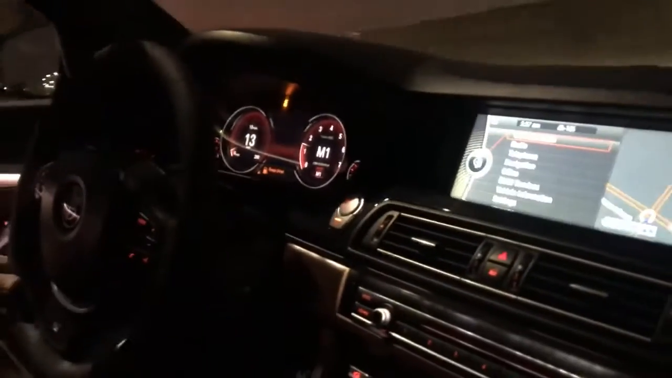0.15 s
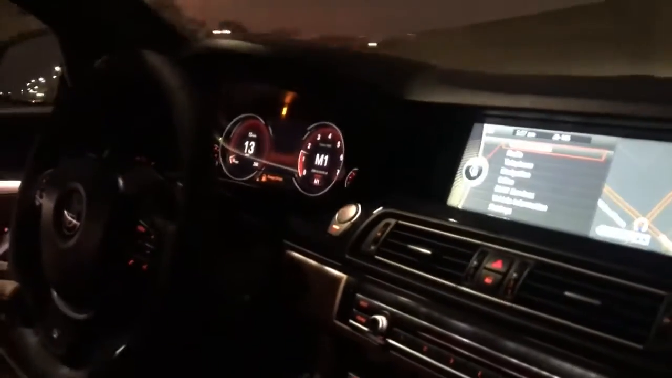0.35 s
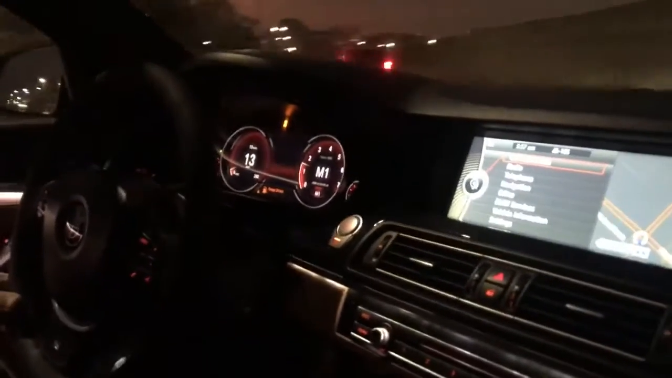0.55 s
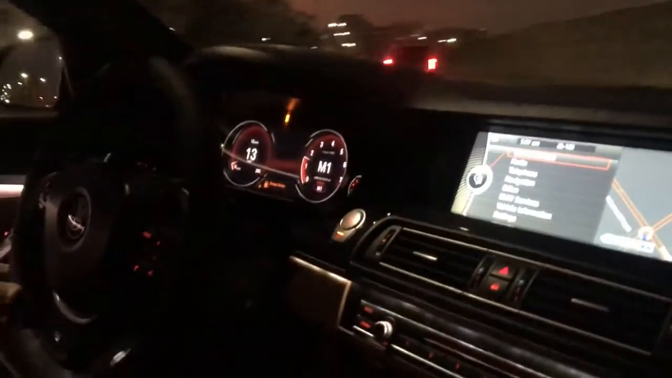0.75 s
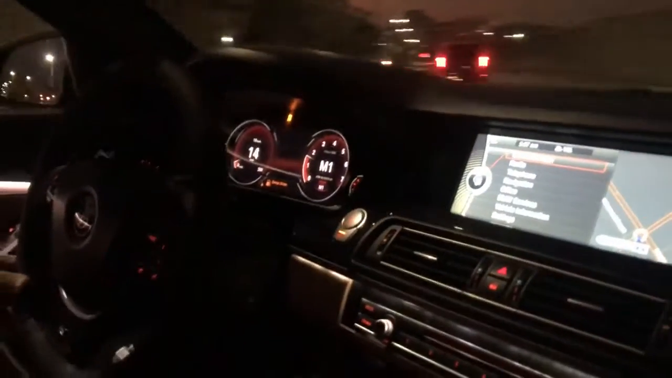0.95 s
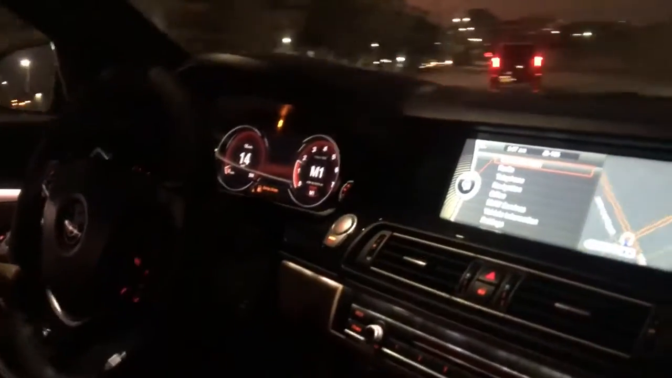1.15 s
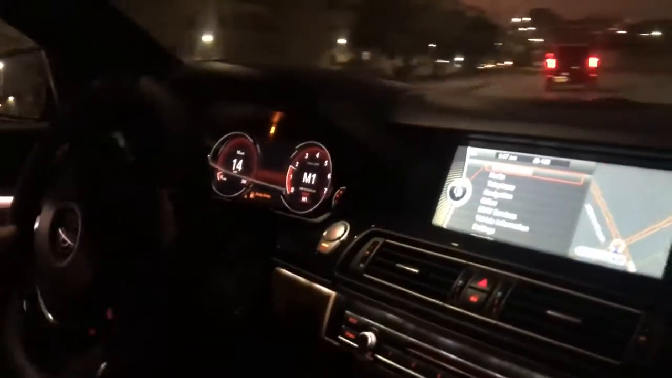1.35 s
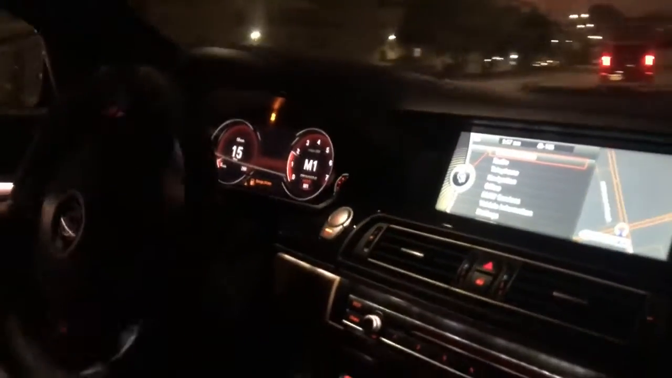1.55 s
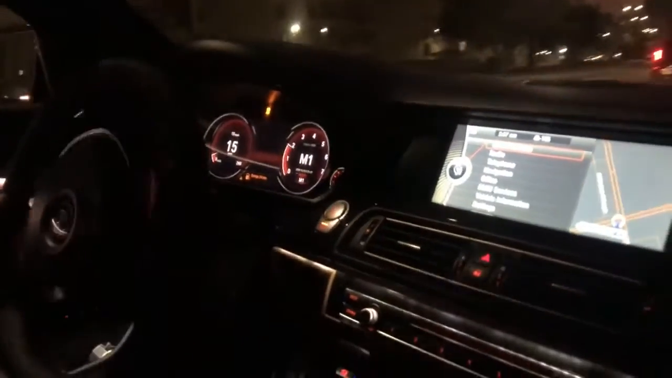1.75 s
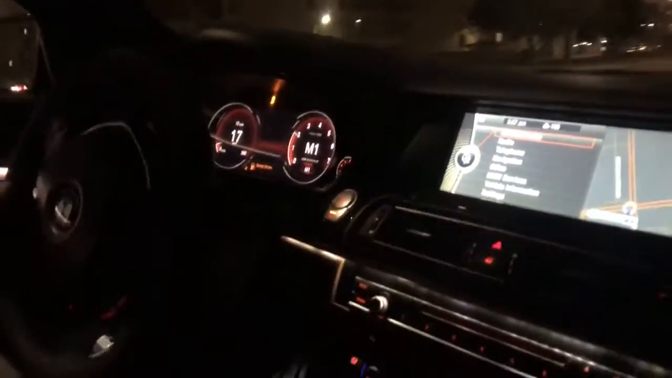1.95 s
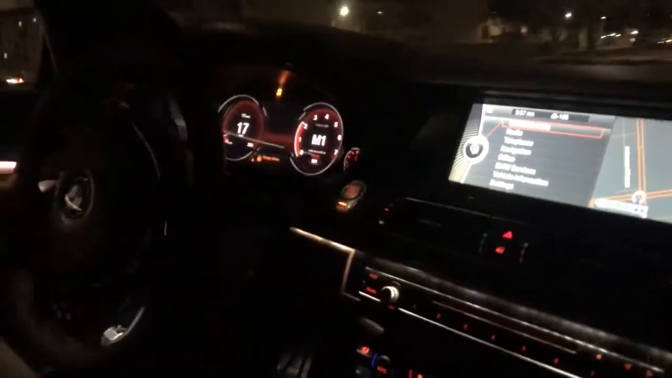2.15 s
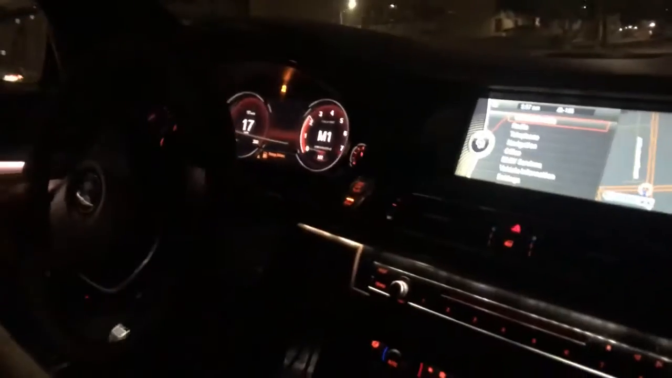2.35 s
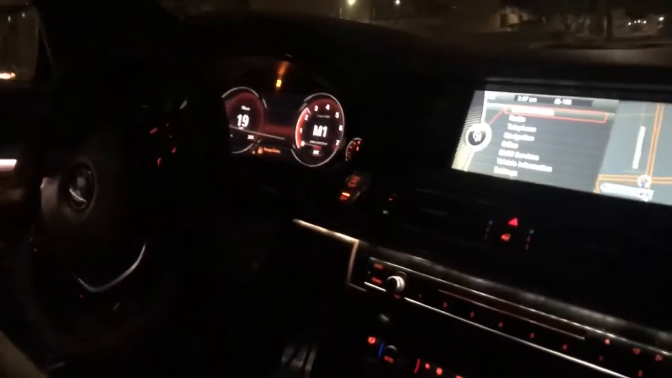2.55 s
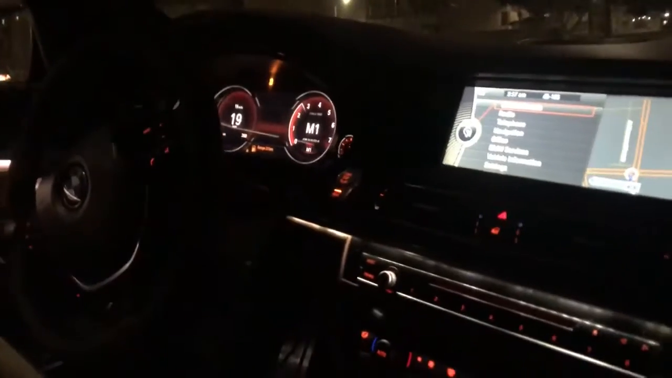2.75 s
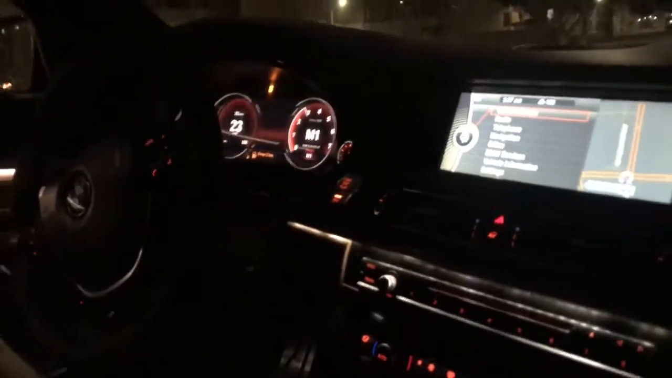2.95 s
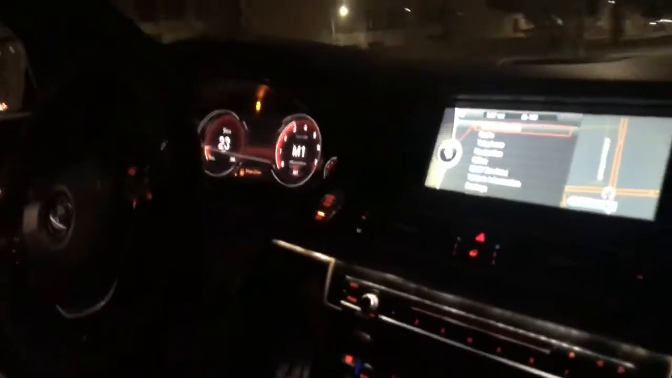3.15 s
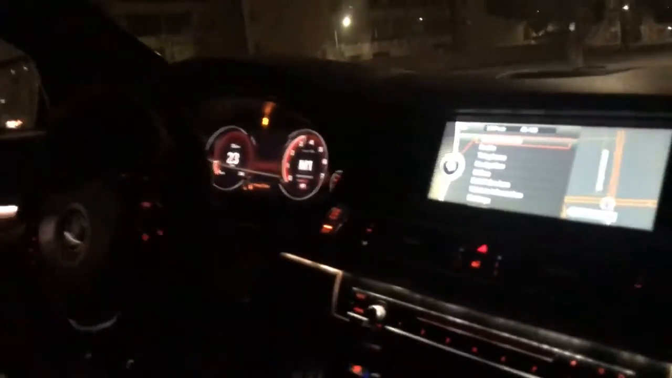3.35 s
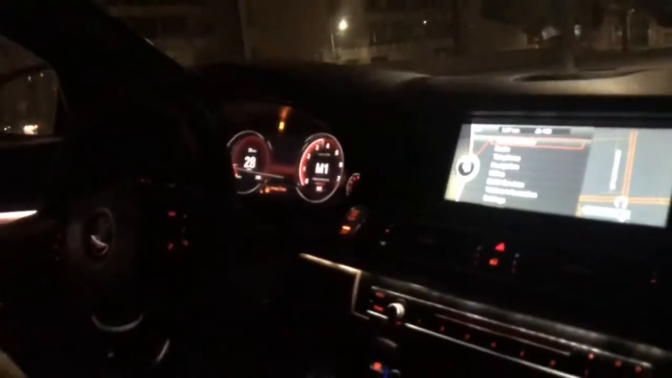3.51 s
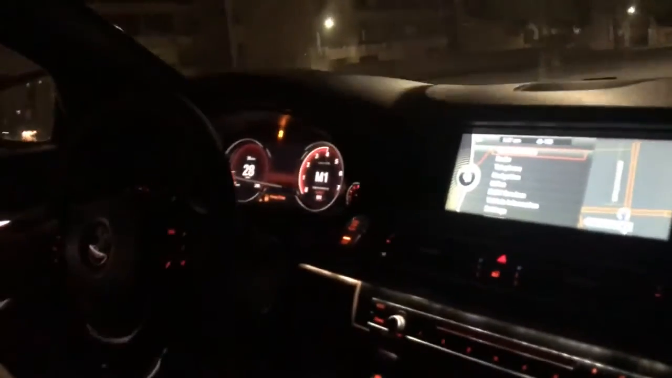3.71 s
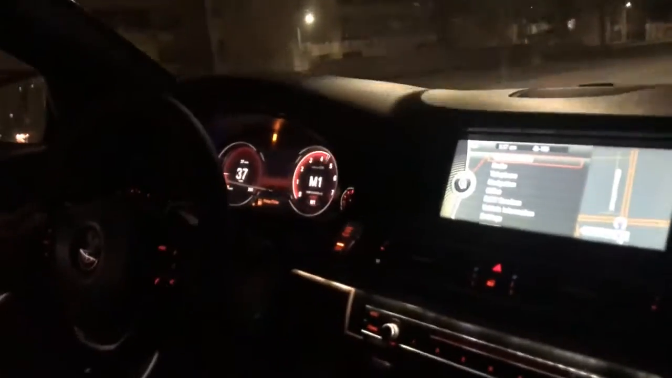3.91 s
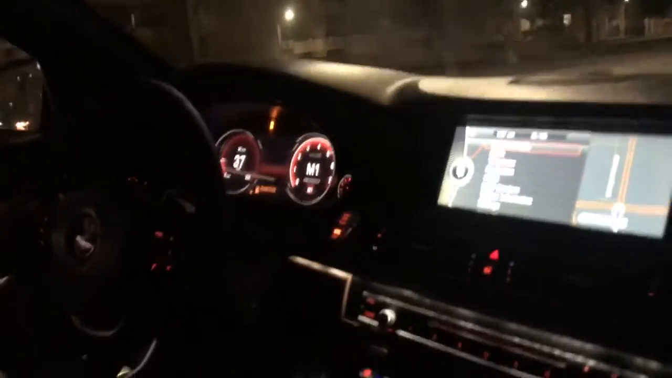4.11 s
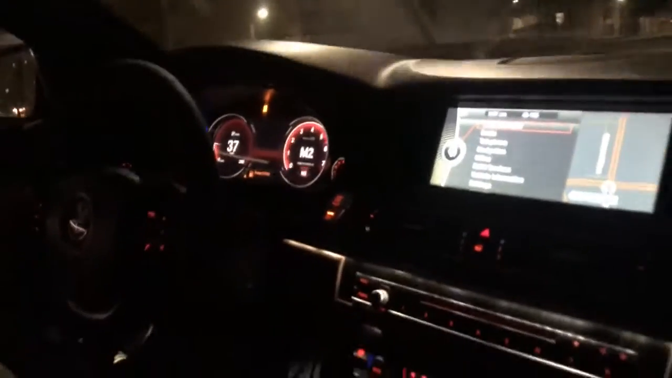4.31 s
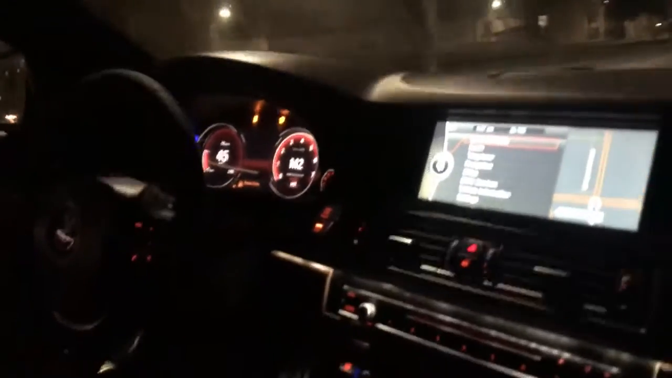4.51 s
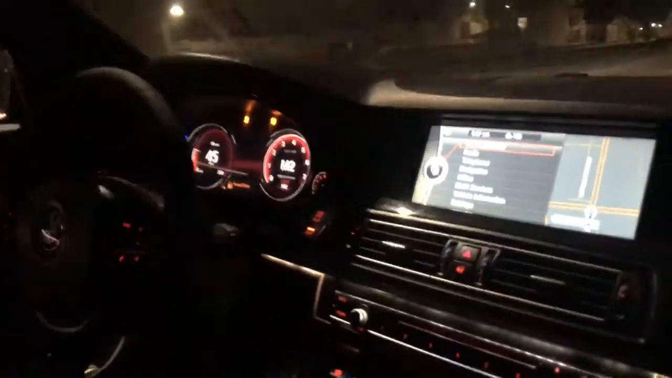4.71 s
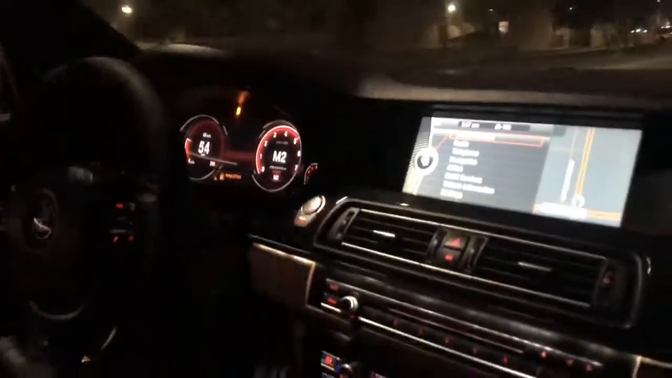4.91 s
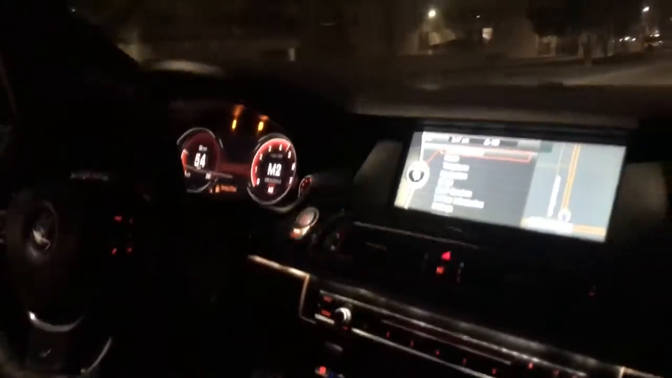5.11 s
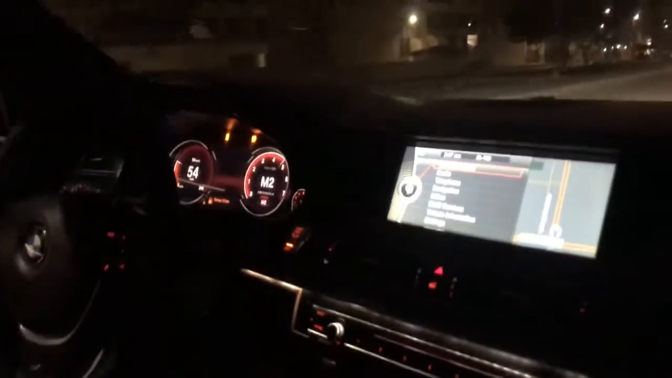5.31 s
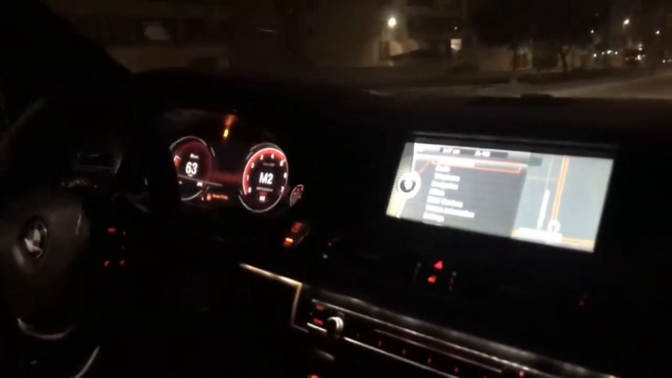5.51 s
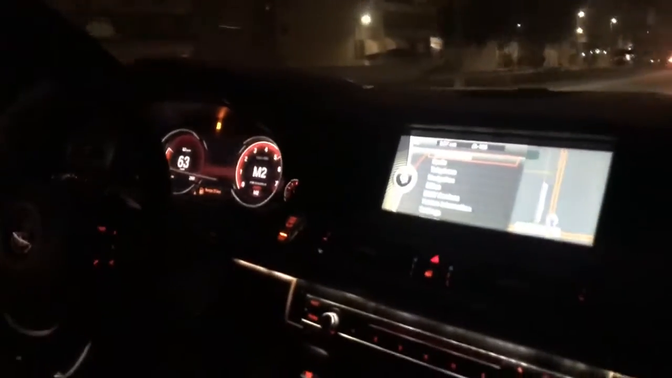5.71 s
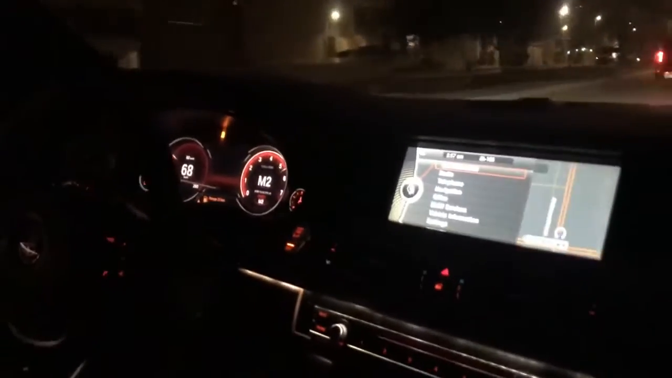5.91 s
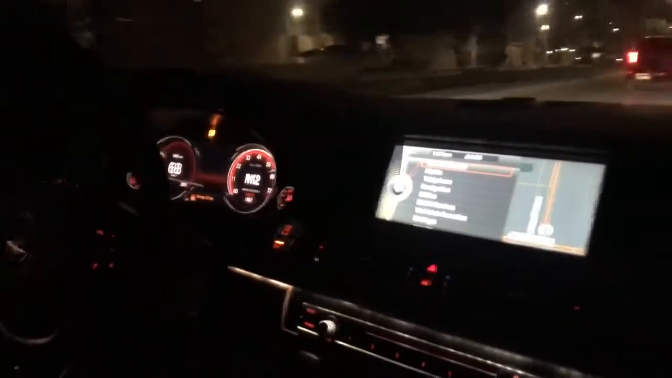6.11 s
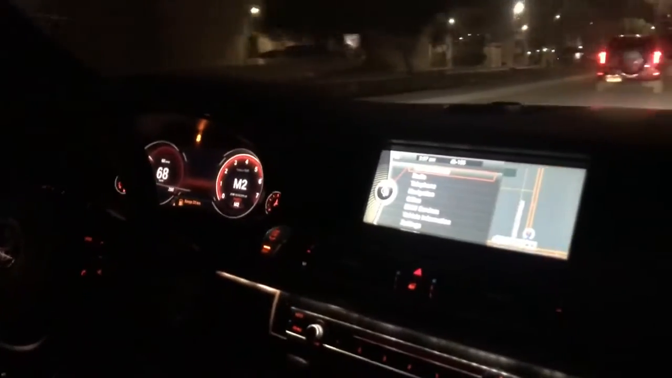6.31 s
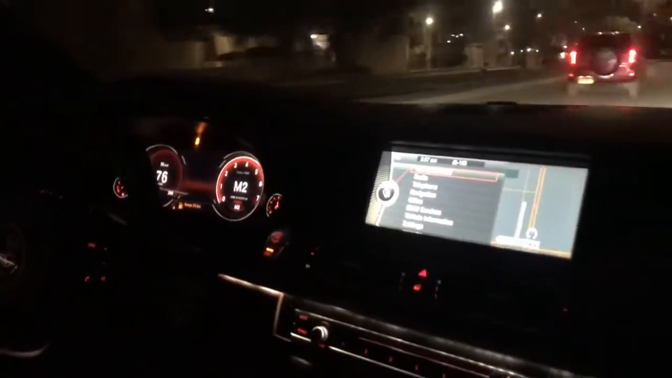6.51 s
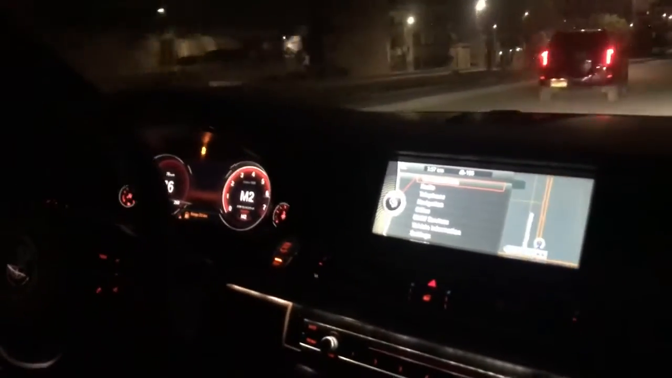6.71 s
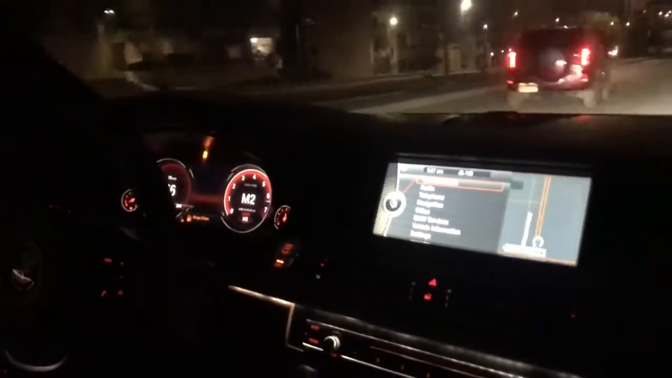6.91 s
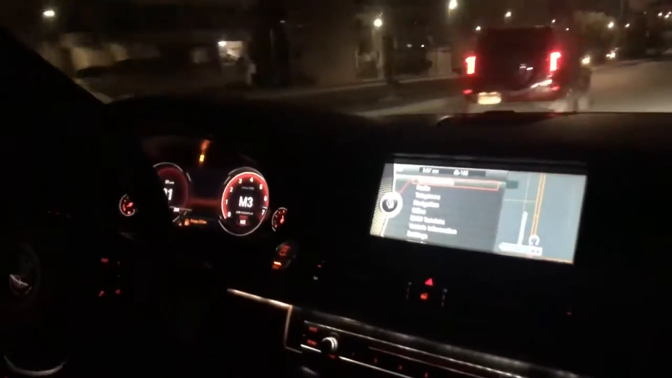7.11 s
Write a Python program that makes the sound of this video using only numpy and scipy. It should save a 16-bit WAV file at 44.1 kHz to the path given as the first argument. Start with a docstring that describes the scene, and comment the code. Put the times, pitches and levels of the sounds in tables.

```python
"""A turbocharged V8 heard from the driver's seat: it cruises, turns a corner, pulls hard through first gear,
shifts up with a stuttering exhaust burp and pulls again. Its boom is a set of tones locked to the crankshaft;
drone, growl, rasp and snarl are repeating pressure and pulsing noise ringing through resonances.
The tyres rumble, the trim ticks, the wheel rim hisses through a hand and the turbos hiss: all shaped noise.
Wavering narrow bands make the intake's roar and rings, and one dry click comes late."""
import sys
import numpy as np
from scipy import signal
from scipy.fft import rfft, irfft, next_fast_len
from scipy.io import wavfile
from scipy.ndimage import map_coordinates

SR = 44100
rng = np.random.default_rng(int(sys.argv[2]) if len(sys.argv) > 2 else 0)


def unload_wav(signal):
    """Save mono or channel-first audio to the path in sys.argv[1] as 16-bit WAV at rate SR, clipped to [-1, 1]."""
    wavfile.write(
        sys.argv[1],
        SR,
        np.round(np.clip(np.atleast_2d(signal).T, -1, 1) * 32767).astype(np.int16),
    )


N = 320166
SECONDS = np.arange(N) / SR


def amp(db):
    """Decibels to gain."""
    return 10 ** (np.asarray(db) / 20)


def unit(x):
    """The sound scaled to an average (rms) level of 1."""
    return x / np.sqrt(np.mean(x ** 2) + 1e-20)


def lookup(x, rows):
    """Each later column of a table, read at x along its first column."""
    knots, *columns = np.transpose(rows)
    return [np.interp(x, knots, column) for column in columns]


def curves(rows):
    """One value per sample for each column after the time."""
    return lookup(SECONDS, rows)


def envelope(start, length, attack, sag_db_per_s, release):
    """A loudness shape: attack, a sagging hold and a release."""
    age = SECONDS - start
    shape = np.interp(age, [0, attack, length, length + release], [0, 1, 1, 0])
    return shape * amp(-sag_db_per_s * np.clip(age, 0, None))


def wobble(rate):
    """A smooth random curve with `rate` random knots a second."""
    at = np.linspace(0, N, N // 32)  # a coarse grid is enough for a slow curve
    knots = rng.standard_normal(int(N * rate / SR) + 4)
    return np.interp(np.arange(N), at, map_coordinates(knots, [at * rate / SR]))


def filtered(x, response):
    """The sound with each frequency multiplied by a response."""
    size = next_fast_len(N + SR // 2)
    return irfft(rfft(x, size) * response(np.fft.rfftfreq(size, 1 / SR)), size)[:N]


def coloured(x, spectrum):
    """The sound through a tone curve of (frequency [Hz], level [dB]) points on a log axis."""
    hz, db = np.transpose(spectrum)
    return filtered(x, lambda f: amp(np.interp(np.log(f + 1), np.log(hz), db)))


def resonate(x, modes):
    """The sound through resonances side by side, each boosting a narrow range; their signs alternate."""
    def response(f):
        total = 0
        for k, (centre, width, db) in enumerate(modes):
            peak = 1j * f * width / (centre * centre - f * f + 1j * f * width)
            total = total + (-1) ** k * amp(db) * peak
        return total
    return filtered(x, response)


def noise(spectrum):
    """Coloured noise of rms 1."""
    return unit(coloured(rng.standard_normal(N), spectrum))


def narrow_band(hz, width_hz):
    """A fuzzy line of rms 1 that follows a pitch: a wave with two randomly wobbling parts."""
    phase = 2 * np.pi * np.cumsum(hz * np.ones(N)) / SR
    return unit(wobble(width_hz) * np.cos(phase) + wobble(width_hz) * np.sin(phase))


def drift(x, share, rate):
    """The sound read at a wandering speed, so its frequencies wander by a small share."""
    return np.interp(np.cumsum(1 + share * wobble(rate)), np.arange(N), x, period=N)


def cabin(x, t60, wet_db):
    """Short reflections between glass and trim make each gliding line swell and fade."""
    t = np.arange(SR // 5) / SR
    tail = rng.standard_normal(len(t)) * amp(-60 * t / t60)  # falls 60 dB in t60 seconds
    return x + amp(wet_db) * signal.fftconvolve(x, tail / np.linalg.norm(tail))[:N]


# How fast the engine spins: (time [s], speed [turns/s])
CRANK_SPEED = [(0,24.3),(.3,24.25),(.75,25.45),(1.25,27.5),(1.8,31.4),(2.2,36.2),(2.5,42.6),(2.7,43.4),(3.0,52.1),(3.18,53.2),(3.55,64.7),(3.8,78.4),(4.2,103),(4.3,104.4),(4.45,101.9),(4.6,101.4),(4.8,107.4),(4.9,108.9),(5.0,107.7),(5.2,88.3),(5.3,84.7),(5.4,84.5),(5.5,87.3),(5.7,90),(6.1,97.7),(6.5,104.5),(6.95,111.2),(7.26,114)]


def crankshaft():
    """Crankshaft speed, and the turns made so far: speed added up over time."""
    speed, = curves(CRANK_SPEED)
    return speed, np.cumsum(speed) / SR


# How crank orders reach the seat, swelling and fading as they sweep through the cabin's modes:
# (frequency [Hz], level [dB]) in each path
SHAKE_PATH = [(24, -55), (75, -44.5), (95, -24), (114, -27)]
EXHAUST_PATH = [(50, -54), (75, -36), (88, -22.5), (98, -14), (110, -21.5), (130, -14), (166, -23.5),
                (182, -16), (200, -24), (217, -33), (226, -28.5)]
FIRING_PATH = [(98, -22.5), (122, -27.5), (136, -17.5), (170, -23.5), (195, -40), (245, -32.5), (290, -28),
               (315, -19), (340, -28), (395, -44.5), (430, -31), (452, -40)]
HUM_PATH = [(146, -27), (160, -36.5), (166, -31.5), (177, -42), (190, -63), (260, -36.5), (312, -33),
            (385, -53.5), (455, -36.5), (540, -46), (680, -39.5)]
UPPER_ODD_PATH = [(200, -55), (235, -57.5), (275, -40.5), (300, -44.5), (335, -44), (385, -58.5),
                  (450, -38.5), (540, -49), (730, -41.5), (775, -47), (930, -40.5), (1100, -35)]
UPPER_EVEN_PATH = [(190, -51), (222, -42), (250, -50), (271, -35.5), (292, -45), (322, -50), (380, -60),
                   (440, -42.5), (510, -48), (860, -38.5), (910, -49), (1040, -53), (1300, -43)]
THIRD_PATH = [(72, -32), (90, -44.5), (130, -38.5), (180, -35), (208, -58), (265, -35), (282, -37.5),
              (315, -27), (345, -36)]
FIFTH_PATH = [(121, -56), (134, -35.5), (170, -39), (208, -59), (245, -60), (275, -36.5), (315, -40),
              (392, -50), (460, -32.5), (488, -40.5), (515, -36.5), (565, -45.5)]
TENTH_PATH = [(245, -64), (265, -42), (278, -43), (295, -66), (520, -61), (700, -50), (1150, -47.5)]
LOPE_PATH = [(250, -49), (600, -49)]
# Tones of the boom; the half orders are the lope of unequal cylinders:
# (order [cycles/turn], path, level added at 0 dB load [dB], level gained with load [dB/dB])
ORDERS = [(1, SHAKE_PATH, 0.1, .05), (2, EXHAUST_PATH, 0.08, .02), (3, THIRD_PATH, .1, .02),
          (3.5, LOPE_PATH, .1, .45), (4, FIRING_PATH, 0.1, 0.17), (4.5, LOPE_PATH, 1.5, .45),
          (5, FIFTH_PATH, -.5, .01), (5.5, LOPE_PATH, -1, .45), (6, HUM_PATH, 0.1, 0.014),
          (7, UPPER_ODD_PATH, -1, 0.03), (8, UPPER_EVEN_PATH, 1, .1), (9, UPPER_ODD_PATH, -4.5, 0),
          (10, TENTH_PATH, 1, 0), (11, UPPER_ODD_PATH, -10, -.04), (12, UPPER_EVEN_PATH, -8, .04),
          (13, UPPER_ODD_PATH, -11.5, -.09)]


def boom(turns, speed, load_db, flutter_db, swell_db, sway):
    """Tones at multiples of the crank speed, smooth at cruise and blurred under load."""
    unrest = amp(0.2 * load_db)
    out = np.zeros(N)
    for order, path, db, growth in ORDERS:
        flicker_db = unrest * np.sqrt(order) * (flutter_db * wobble(22) + swell_db * wobble(7))
        level_db = db + lookup(order * speed, path)[0] + growth * load_db + flicker_db
        phase = 2 * np.pi * (order * turns + rng.random())
        phase_sway = unrest * sway * order * wobble(24)
        out += np.sqrt(2) * amp(level_db) * np.sin(phase + phase_sway)
    return out


def engine_cycle(turns, half_order_db, top_order, jitter):
    """Pressure repeating every two turns; unequal cylinders add half orders, gears a whine."""
    order = np.arange(2 ** 12 + 1) / 2
    half = order % 1 > 0
    # half orders start above 4, whole orders above 6
    present = (order > 4) & (order <= top_order) & (half | (order > 6))
    whine_db = 6 * np.exp(-((order - 29) / 1.3) ** 2)
    random_phase = np.exp(2j * np.pi * rng.random(len(order)))
    cycle = irfft(present * amp(half_order_db * half + whine_db) * random_phase)
    cycle_turns = np.arange(len(cycle)) * 2 / len(cycle)
    return np.interp(turns + jitter * wobble(70), cycle_turns, cycle, period=2)


def firing(turns, modes, tonal, depth, flutter_db):
    """Repeating pressure and pulsing turbulence ring resonances that swell and fade separately."""
    def ring(x):
        total = 0
        for k, mode in enumerate(modes):
            total = total + (-1) ** k * amp(flutter_db * wobble(16)) * resonate(x, [mode])
        return unit(total)

    wave = cabin(engine_cycle(turns, half_order_db=-2.5, top_order=72, jitter=.003), t60=.09, wet_db=0)
    # the noise pulses at one, two and four cycles a turn
    gate = np.exp(depth * sum(np.cos(2 * np.pi * k * turns) for k in (1, 2, 4)))
    puffs = cabin(gate * rng.standard_normal(N), t60=.14, wet_db=-5)
    share = np.clip(tonal, 0, 1)
    turbulence = drift(ring(puffs), share=.01, rate=6)
    return unit(np.sqrt(share) * ring(wave) + np.sqrt(1 - share) * turbulence)


# How hard the engine works: (time [s], load [dB])
LOAD = [(0.0, -34), (1.25, -38), (1.7, -27), (2.1, -31), (2.4, -20.5), (2.8, -20.5), (3.25, -17), (3.5, -8),
        (3.66, -4.5), (3.8, -0.3), (4.05, 2.5), (4.5, -1.5), (5.03, 1), (5.14, 0), (5.23, -2), (5.29, -1),
        (6.5, -0.5), (7.0, 3), (7.26, 3.5)]
# Panels drone as the engine passes its middle speeds: (speed [turns/s], level [dB])
DRONE = [(30, -69.5), (35, -50), (42, -41), (52, -43), (60, -41.5), (68, -53), (85, -60)]
# What the load brings out: (load [dB], growl [dB], rasp [dB], snarl [dB])
VOICING = [(-42, -83, -68, -67), (-19.5, -44, -52, -59.5), (-8, -35.5, -47, -58), (-4.5, -35.5, -36.5, -49),
           (-0.5, -29, -30, -38), (1, -27, -29, -37.5)]
# Resonances of the four voices: (frequency [Hz], width [Hz], relative level [dB])
DRONE_MODES = [(651, 45, 3.5), (712, 59, 1.5), (1110, 66, -11.5), (1336, 64, -16), (1630, 63, -13.5),
               (1830, 70, -12.5)]
GROWL_MODES = [(246, 110, 0), (440, 160, -2.5), (650, 61, 0), (748, 84, 1), (840, 88, 1.5),
               (1034, 158, -3.5)]
RASP_MODES = [(1162, 58, -3.5), (1250, 57, -3.5), (1339, 52, 0.5), (1477, 79, -5), (1600, 140, -7),
              (1831, 82, -7.5), (2005, 130, -14)]
SNARL_MODES = [(2210, 102, 0.5), (2435, 92, 2), (2574, 96, -3), (2735, 130, -8)]
# The ignition cut for the shift, and the burp that fills it
CUT_S, CUT_LENGTH_S = 5.002, .245
CUT_DUCK_DB = -3  # change in the boom
BURP_DB, BURP_ATTACK_S, BURP_SAG_DB_PER_S, BURP_RELEASE_S = -14.5, 0.0059, 28.5, 0.08


def engine(turns, speed):
    """The boom, panels that drone with speed, and growl, rasp and snarl that follow the load."""
    load_db, = curves(LOAD)
    growl_db, rasp_db, snarl_db = lookup(load_db, VOICING)
    drone_db, = lookup(speed, DRONE)
    cut = envelope(CUT_S, CUT_LENGTH_S, BURP_ATTACK_S, 0, BURP_RELEASE_S)
    tones = boom(turns, speed, load_db, flutter_db=.95, swell_db=.7, sway=.09)
    drone = amp(drone_db) * firing(turns, DRONE_MODES, tonal=0.72, depth=0.22, flutter_db=1.3)
    growl = amp(growl_db) * firing(turns, GROWL_MODES, tonal=0.46, depth=0.26, flutter_db=2.2)
    rasp = amp(rasp_db) * firing(turns, RASP_MODES, tonal=0.7, depth=0.15, flutter_db=2.4)
    snarl = amp(snarl_db) * firing(turns, SNARL_MODES, tonal=0.59, depth=0.2, flutter_db=2.5)
    return amp(CUT_DUCK_DB * cut) * tones + drone + growl + rasp + snarl


# Rise and fall of the tyre rumble: (time [s], relative level [dB])
ROAD = [(0.0, -37), (1.3, -30.5), (2.7, -30), (4.1, -26), (5.4, -23.5), (5.9, -27.5), (6.5, -23),
        (7.26, -23)]
# Tone of the floor rumble and of the tread roar: (frequency [Hz], relative level [dB])
RUMBLE = [(12, -48.5), (22, -17), (42, 0), (52, -0.5), (70, -4.5), (95, -2.5), (125, -9), (170, -18),
          (240, -24), (400, -32), (800, -53), (3000, -110)]
TREAD = [(100, -21), (200, -7), (290, -5.5), (365, 5.5), (500, 1.5), (700, 4), (1200, 2.5), (1700, -3),
         (2500, -11), (4000, -15), (7000, -24), (10000, -29), (15500, -28)]


def road():
    """Tyre noise: a lumpy low rumble through the floor and a steady tread roar."""
    rumble = amp(curves(ROAD)[0] + 2 + 1.2 * wobble(12)) * noise(RUMBLE)
    roar = amp(-51.5 + 0.23 * wobble(11)) * noise(TREAD)
    return rumble + roar


# Trim ticks: (time [s], snap level [dB], knock level [dB], knock pitch [Hz], time to fall 60 dB [s])
TICKS = [(.153, -70, -47, 1850, .05), (.639, -56, -37, 980, .06), (1.159, -42, -47, 1800, .035),
         (4.91, -37, -45, 2400, .012)]
# Tone of the snap: (frequency [Hz], relative level [dB])
SNAP = [(800, -20), (3000, -5), (6000, 0), (9000, -2), (15500, -6)]


def trim():
    """Plastic trim ticks: a bright snap and a dull knock, both noise, that die together."""
    out = np.zeros(N)
    snap = noise(SNAP)
    for start, snap_db, knock_db, hz, t60 in TICKS:
        age = SECONDS - start
        knock = noise([(hz / 3, -25), (hz * .75, 0), (hz * 1.3, 0), (hz * 3, -28), (hz * 6, -60)])
        decay = (age > 0) * amp(-60 * np.abs(age) / t60)
        out += decay * (amp(snap_db) * snap + amp(knock_db) * knock)
    return out


# The wheel rim sliding through a hand: (time [s], level [dB])
SLIDE = [(1.1, -88), (1.3, -67), (1.66, -60), (1.75, -47), (1.88, -51), (2.05, -47), (2.26, -52),
         (2.36, -47), (2.6, -53.5), (2.85, -71), (3, -99)]
# Tone of leather on skin: (frequency [Hz], relative level [dB])
LEATHER = [(1200, 0), (2500, -5), (4000, 1), (5200, -2), (6500, -1), (9000, -1), (10700, -2), (13500, 4),
           (15700, -1.5)]


def steering():
    """The leather rim rubs through the hand: uneven noise, duller where it is quieter."""
    slide_db = curves(SLIDE)[0] + wobble(82) + .8 * wobble(18)
    hiss = noise(LEATHER)
    bright = np.interp(slide_db, [-62, -50], [0, 1])
    dull = coloured(hiss, [(7000, 6.0), (13000, -7.5)])
    return amp(slide_db) * (bright * hiss + (1 - bright) * dull)


# Air rushing through the turbochargers: (time [s], relative level [dB])
BOOST = [(3.25, -57), (3.6, -49), (3.95, -41), (4.25, -40), (4.5, -45), (5.0, -42), (5.22, -47), (5.7, -41),
         (6.2, -40), (6.9, -42), (7.26, -45.5)]
# Tone of the rushing air and of its fizz: (frequency [Hz], relative level [dB])
AIR = [(1500, 6), (2900, 4.5), (4000, -0.5), (4900, -5), (6000, -2.5), (7500, -11), (9500, -20),
       (11500, -28), (15500, -22)]
FIZZ = [(5000, -12.5), (9000, 0.5), (10500, -12.5), (11700, 1.5), (15500, -5)]


def turbo(turns):
    """Compressed air hisses, pulsing as the valves gulp it; its fizz grows faster than the flow."""
    flow_db = curves(BOOST)[0] + .5 * wobble(25)
    gulps = 1 + 0.065 * np.cos(2 * np.pi * 2 * turns)  # two a turn
    spool = np.interp(SECONDS, [2.6, 2.9], [0, 1])
    rush = amp(flow_db + 3.5) * unit(cabin(noise(AIR), t60=0.11, wet_db=-8.5))
    fizz = amp(1.45 * flow_db + 6.0) * noise(FIZZ)
    return spool * gulps * (rush + fizz)


# Intake roar bands: (order [cycles/turn], wobble rate [Hz], level [dB])
SWELL_BANDS = [(12, 60, -38), (17.8, 60, -39.5), (22, 200, -45)]
SWELL_S, SWELL_ATTACK_S, SWELL_LENGTH_S, SWELL_RELEASE_S = 3.27, .33, .45, .15


def intake_swell(speed):
    """Bands of intake roar climb with the crank while the throttle opens."""
    swell = envelope(SWELL_S, SWELL_LENGTH_S, SWELL_ATTACK_S, 0, SWELL_RELEASE_S)
    bands = sum(amp(db) * narrow_band(order * speed, width_hz) for order, width_hz, db in SWELL_BANDS)
    return swell * bands


# The intake rings out: (time [s], length [s], pitch [Hz], level before sagging [dB])
RINGS = [(3.72, .21, 1335, -35), (3.811, .28, 2454, -35.5), (4.02, .25, 1335, -35.5), (4.3, .33, 2215, -41),
         (4.678, .25, 2470, -38), (5.249, .035, 2425, -36), (5.34, .18, 2450, -40),
         (5.38, .55, 1345, -36.5), (5.62, .36, 2560, -39.5), (5.95, 1.1, 1315, -33.5)]


def intake_ring():
    """Narrow, wavering rings in the intake flare up under boost."""
    out = np.zeros(N)
    for start, length, hz, db in RINGS:
        shape = envelope(start, length, attack=.02, sag_db_per_s=8, release=.04)
        out += amp(db) * shape * narrow_band(hz * (1 + .006 * wobble(12)), 45)
    return out


# Exhaust pipe resonances: (frequency [Hz], width [Hz], relative level [dB])
PIPE_MODES = [(104, 49, -3.5), (140, 60, -4), (200, 60, -13), (324, 26, -20), (460, 14, -18),
              (714, 100, -28.5)]


def shift(turns):
    """With the ignition cut, the exhaust thumps once per engine cycle, muffled by the body."""
    turns_at_cut = np.interp(CUT_S, SECONDS, turns)
    cycles = (turns - turns_at_cut) / 2 + .035 * wobble(40)  # two turns a cycle, timing uneven
    count = np.floor(cycles)
    thumps = -np.diff(count, prepend=count[0]) * amp(0.99 * wobble(48))
    muffled = coloured(resonate(thumps, PIPE_MODES), [(700, -4), (1800, -27), (4000, -42)])
    burp = envelope(CUT_S - BURP_ATTACK_S, CUT_LENGTH_S, BURP_ATTACK_S, BURP_SAG_DB_PER_S, BURP_RELEASE_S)
    return amp(BURP_DB) * burp * unit(muffled)


CLICK_S, CLICK_DB, CLICK_DECAY_S = 6.7018, -11, .00015


def click():
    """One dry click with no ring: a jump that dies away almost at once."""
    age = SECONDS - CLICK_S
    return amp(CLICK_DB) * (age > 0) * np.exp(-np.abs(age) / CLICK_DECAY_S)


def scene():
    """Everything in the cabin, the engine's parts locked to one crankshaft."""
    speed, turns = crankshaft()
    mix = engine(turns, speed) + road() + trim() + steering() + turbo(turns)
    mix = mix + intake_swell(speed) + intake_ring() + shift(turns) + click()
    return mix[None]


TOP_HZ = 15850


def record(dry):
    """Keeps only the frequencies below the band limit."""
    return filtered(dry[0], lambda hz: hz < TOP_HZ)[None]


dry = scene()
out = record(dry)
unload_wav(out)
```